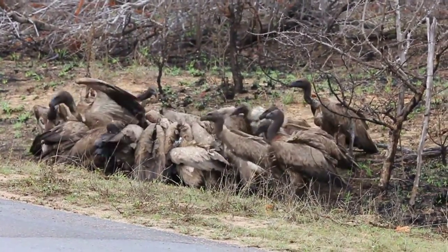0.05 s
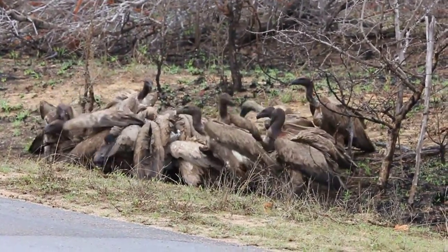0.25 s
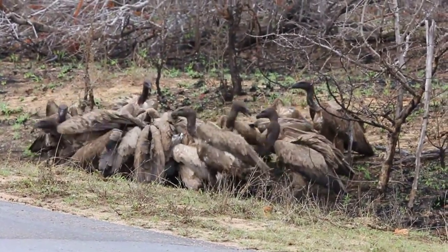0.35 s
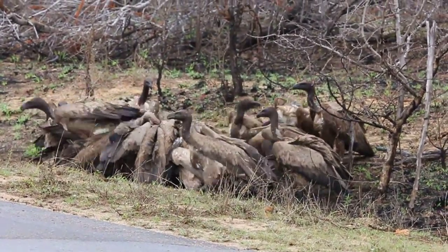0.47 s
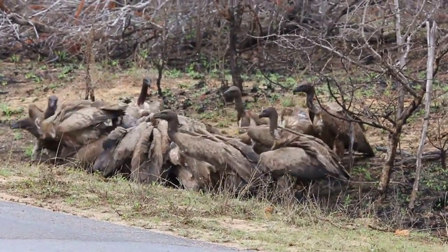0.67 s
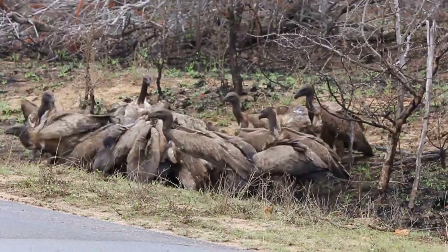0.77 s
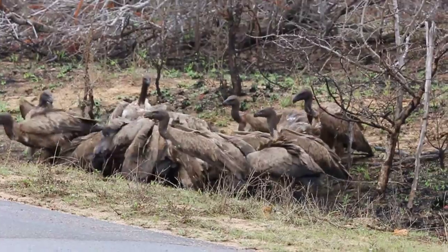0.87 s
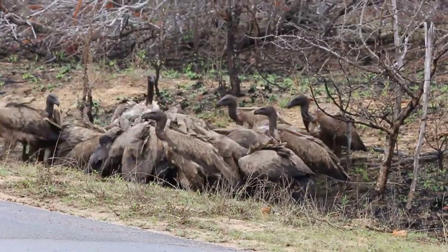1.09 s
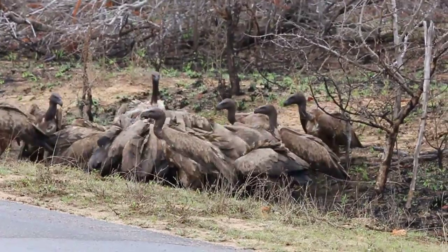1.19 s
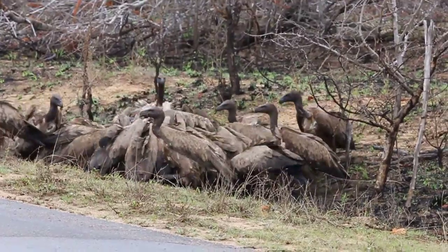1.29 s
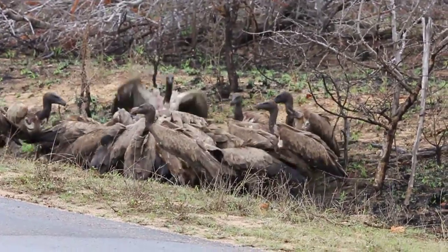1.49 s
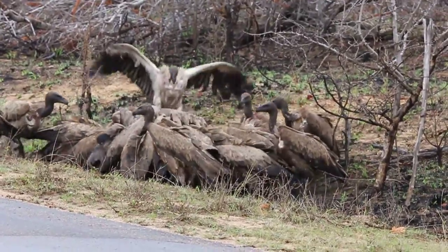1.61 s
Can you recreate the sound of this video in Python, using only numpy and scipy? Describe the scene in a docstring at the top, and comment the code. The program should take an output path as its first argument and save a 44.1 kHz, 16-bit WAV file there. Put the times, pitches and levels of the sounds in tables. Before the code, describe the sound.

Vultures squabble in the open over light wind and a low throb like an idling car. Thin whines and a faint hiss come first. A harsh rasp builds from 0.2 seconds, peaking with a loud squeal near 0.3. A shorter, softer rasp with two whines answers at 0.5. Feathers and dry grass rustle faintly, and a long, soft hiss runs from 1 second to the end, around 1.6.

```python
"""Vultures jostle at a roadside, over light wind and a low throb like an idling car.
First come thin whines from the windpipe and a fading hiss. A harsh rasp builds, made by
snapping tissue and air ringing the throat; one loud squeal cuts in and sinks under it.
Feathers and dry grass rustle now and then. A shorter rasp answers with two more whines,
and last a bird gives a long hiss, forcing air through its open beak."""
import sys
import numpy as np
from scipy import signal
from scipy.fft import rfft, irfft
from scipy.io import wavfile

SR = 44100
rng = np.random.default_rng(int(sys.argv[2]) if len(sys.argv) > 2 else 0)


def pcm_store(signal):
    """Save signal as 16-bit PCM."""
    levels = np.round(np.clip(np.atleast_2d(signal), -1, 1) * 32767)
    wavfile.write(sys.argv[1], SR, levels.astype(np.int16).T)


N = 72765
T, HZ = np.arange(N) / SR, np.fft.rfftfreq(N, 1 / SR)

# tone colour of the first and last hiss (frequency [Hz], relative level [dB])
BEAK_COLOUR = [(1500, -66), (2900, -10), (3400, -5), (3900, 1), (4600, -1), (5800, -0.5), (7000, -4.5),
               (9000, -10), (11000, -22), (12600, -23.5), (14000, -20.5), (16000, -29)]


def amp(db):
    """Turns decibels into a gain to multiply by."""
    return 10 ** (np.asarray(db) / 20)


def unit(x):
    """Scales a signal to an average (rms) size of 1."""
    return x / np.sqrt(np.mean(x ** 2) + 1e-20)


def shape(points):
    """Joins (frequency, level) points into a gain for every frequency."""
    hz, db = np.transpose(points)
    return amp(np.interp(np.log(HZ + 1), np.log(hz), db))


def filtered(x, gain):
    """Weights each frequency by its gain, then scales to size 1."""
    return unit(irfft(rfft(x) * gain, N))


def noise(gain):
    """Noise with the given tone colour."""
    return filtered(rng.standard_normal(N), gain)


def drift(hz):
    """A random wobble, up to about hz times a second."""
    return noise(np.exp(-(HZ / hz) ** 2))


def level(times, db):
    """A gain that follows a level curve and is silent outside it."""
    return amp(np.interp(T, times, db, left=-120, right=-120))


def voiced(source, colour, curve):
    """Colours a sound, then makes it follow a curve of level and brightness."""
    times, db, brightness = np.transpose(curve)
    brightness = np.interp(T, times, brightness)
    octaves = np.log2(np.clip(HZ, 1500, 11000) / 3000)
    out = np.zeros(N)
    for tilt in range(-16, 17, 4):  # blend copies from dull to bright
        share = np.maximum(1 - abs(brightness - tilt) / 4, 0)
        out += share * filtered(source, colour * amp(tilt * octaves))
    return out * level(times, db)


def wind():
    """Moving air makes a low noise that gently swells."""
    # tone colour of the wind (frequency [Hz], relative level [dB])
    colour = [(20, -6), (55, -3), (85, 0.5), (145, -1), (200, -9), (285, -3), (380, -7.5), (560, -8.5),
              (700, -14), (890, -10), (1000, -13.5), (1250, -17), (1480, -15.5), (2000, -20), (4000, -26.5),
              (8000, -36), (12000, -38), (15500, -42)]
    return amp(-39.5 + .5 * drift(hz=2)) * noise(shape(colour))


def engine():
    """Each firing gives a soft thump and a puff of clatter, over a faint hum."""
    # tone colour of the clatter (frequency [Hz], relative level [dB])
    clatter_colour = [(60, -8), (140, -6.5), (300, -2), (500, -15.5), (1000, -15.5), (2500, -42.5)]
    # tones of the hum (frequency [Hz], level [dB])
    hum_tones = [(91, -47.5), (104, -48.5), (129, -55), (145, -49.5), (365.5, -52.5), (467, -60),
                 (851, -54.5)]
    firing_hz, first_firing_s, thump_s, clatter_s = 22.75, 0.032224, 0.002744, 0.0165
    firings = (T - first_firing_s) * firing_hz + .5
    offset_s = (firings % 1 - .5) / firing_hz  # time from the nearest firing
    strength = (1 + .25 * rng.standard_normal(N))[np.floor(firings).astype(int) + 1]
    thump = -strength * amp(2.5 * T) * np.exp(-(offset_s / thump_s) ** 2)  # grows 2.5 dB a second
    thump = signal.sosfilt(signal.butter(1, 55.3, "high", fs=SR, output="sos"), thump)
    clatter = noise(shape(clatter_colour)) * np.exp(-abs(offset_s) / clatter_s)
    hum = sum(amp(db) * unit(np.sin(2 * np.pi * (hz * T + rng.random()) + 0.4 * drift(hz=1.33)))
              for hz, db in hum_tones)
    return amp(-42.5) * unit(thump) + amp(-49) * unit(clatter) + hum


def whistle(hz, overtone_db, jitter, flutter):
    """A windpipe tone with three overtones; jitter shakes its pitch, flutter its level."""
    phase = 2 * np.pi * np.cumsum(hz * (1 + jitter * drift(hz=444))) / SR
    bend_db = 5.5  # lifts the first overtone and lowers the third
    gains = [amp(overtone_db * k - bend_db * k * (k - 2)) for k in range(4)]
    tone = sum(gain * np.sin((k + 1) * phase) for k, gain in enumerate(gains))
    tone /= np.sqrt(sum(gain ** 2 for gain in gains))
    return unit(tone * (1 + flutter * drift(hz=220)))


def whines():
    """Short, sliding windpipe notes that swell and fade."""
    # (start [s], length [s], first pitch [Hz], last pitch [Hz], level [dB], jitter [share of pitch])
    notes = [(-.01, 0.0776, 1524, 1618, -47, 0.036), (-.01, 0.1178, 2010, 2155, -43, 0.0414),
             (0.064, 0.078, 2177, 2333, -42.5, .04), (0.075, 0.049, 1810, 1728, -41, 0.024),
             (0.143, 0.0365, 2590, 2469, -43, 0.0444), (0.157, 0.098, 1976, 1595, -39.5, 0.027),
             (0.188, 0.0641, 2371, 2127, -33.5, .055), (0.516, 0.0286, 1836, 1831, -34.5, 0.0327),
             (0.496, 0.073, 1587, 1467, -40, 0.0386)]
    out = np.zeros(N)
    for start, length, first_hz, last_hz, db, jitter in notes:
        progress = np.clip((T - start) / length, 0, 1)
        swell = np.sqrt(abs(np.sin(np.pi * progress)))
        hz = first_hz + (last_hz - first_hz) * progress
        out += amp(db) * swell * whistle(hz, overtone_db=-21, jitter=jitter, flutter=.55)
    return out


def hiss(curve, colour):
    """Air forced through an open beak, fluttering slightly."""
    air = rng.standard_normal(N) * amp(0.62 * drift(hz=90))
    return voiced(air, shape(colour), curve)


def fading_hiss():
    """A faint breath through the beak dies away."""
    # course of the breath (time [s], level [dB], brightness [dB per octave])
    curve = [(0, -55.5, 6.5), (.03, -47, -3.5), (.08, -55.5, 2), (.125, -56.5, -6), (.16, -51, -2),
             (.2, -55, 10)]
    return hiss(curve, BEAK_COLOUR)


def rasp(curve, throat):
    """Uneven snaps of tissue and rushing air make the throat ring."""
    # air that slips past without ringing (frequency [Hz], relative level [dB])
    air_colour = [(1000, -69.5), (1350, -33), (1550, -3.5), (4000, -7), (6000, -38), (8500, -18),
                  (11500, -28.5), (13800, -34.5), (16000, -36)]
    snaps_per_s, breath_gain, low_cut_hz = 520, 0.558, 1490
    snap_count = np.cumsum(snaps_per_s * np.exp(.4 * drift(hz=500.46))) / SR
    snaps = np.diff(np.floor(snap_count), prepend=0) * amp(2 * rng.standard_normal(N))
    source = unit(snaps - snaps.mean()) + breath_gain * rng.standard_normal(N)
    rattle = amp(1.2 * drift(hz=170))
    rings = sum(amp(db) / (1 + 1j * (HZ - hz) / width) ** 2 for hz, width, db in throat)
    low_cut = 1 / np.sqrt(1 + (low_cut_hz / (HZ + 1)) ** 30)
    return voiced(-source * rattle, (rings + shape(air_colour)) * low_cut, curve)


def long_rasp():
    """A harsh throat call that builds, holds and drops away."""
    # course of the call (time [s], level [dB], brightness [dB per octave])
    curve = [(.17, -52.5, -5), (.205, -38, 3.5), (.235, -35, 1.5), (.25, -34, -6.5), (.268, -29, -0.5),
             (.281, -24.5, 1), (.294, -20, 0.5), (.312, -21, -1.5), (.362, -23, 0.5), (.376, -26, 0),
             (.39, -25.5, 2.5), (.404, -41, 3), (.415, -45.5, -5.5), (.46, -48, -3.5)]
    # where the throat rings (frequency [Hz], half-width [Hz], relative level [dB])
    throat = [(1566, 66, -9), (1920, 195, -0.5), (2302, 334, 5.5), (2990, 217, 4.5), (3390.5, 220, 5),
              (3819.6, 328, 3), (4180, 177, 0.5), (5200, 413, -0.5), (5747, 404, -10), (7366, 276, -15)]
    return rasp(curve, throat)


def squeal():
    """A loud windpipe tone climbs, cracks and lingers low; air rushes out as it starts."""
    # the tone (time [s], pitch [Hz], level [dB], tilt [dB per overtone], jitter [share of pitch])
    tone_curve = [(.238, 2130, -38.5, -3, 0.0299), (.251, 2170, -21.5, -18, 0.0147),
                  (.259, 2270, -23.5, -16, 0.0257), (.265, 2450, -23.5, -18.5, 0.0153),
                  (.275, 2600, -17.5, -13, 0.0129), (.279, 2080, -18, -9.5, .04),
                  (.286, 1800, -23.5, 12.5, .045), (.291, 1500, -23.5, 0, 0.0404),
                  (0.305, 1467, -24, 1, 0.0154), (0.316, 1484, -31.5, -10, 0.017),
                  (.36, 1487, -31.5, -11, 0.0263), (0.384, 1490, -39, -27.5, 0.0333),
                  (.405, 1430, -46.5, -6, .03)]
    # the rush of air (time [s], level [dB], brightness [dB per octave])
    air_curve = [(.23, -47, -2), (.25, -34.5, -5), (.268, -28, -2.5), (.282, -28, -5.5), (.294, -26, -5),
                 (.303, -42, -5)]
    # tone colour of that air (frequency [Hz], relative level [dB])
    air_colour = [(1500, -36.5), (3000, -5), (4100, -4), (5500, 2.5), (7000, 1), (8500, -8.5), (10000, -18),
                  (12000, -28.5), (16000, -30.5)]
    times, hz, db, overtone_db, jitter = np.transpose(tone_curve)
    hz, overtone_db, jitter = (np.interp(T, times, column) for column in (hz, overtone_db, jitter))
    tone = level(times, db) * whistle(hz, overtone_db, jitter, flutter=.2)
    return tone + hiss(air_curve, air_colour)


def rustles():
    """Feathers and dry grass scratch briefly."""
    # (start [s], length [s], level [dB], middle frequency [Hz], half-width [octaves])
    scratches = [(.275, 0.061, -50, 13730, 0.146), (0.41, 0.0267, -52, 12950, 0.45),
                 (.65, 0.0071, -46, 3970, 0.68), (0.864, 0.0061, -49.5, 5000, 0.81),
                 (1.565, 0.011, -53, 10000, .9)]
    out = np.zeros(N)
    for start, length, db, hz, width in scratches:
        swell = np.sin(np.pi * np.clip((T - start) / length, 0, 1)) ** 2
        band = np.exp(-(np.log2((HZ + 1) / hz) / width) ** 2)
        out += amp(db) * swell * noise(band)
    return out


def short_rasp():
    """A shorter, softer throat call answers."""
    # course of the call (time [s], level [dB], brightness [dB per octave])
    curve = [(.48, -48.5, -2), (.503, -36, -7), (.526, -29.5, -5), (.546, -33, -4), (.566, -48.5, -2),
             (.6, -45.5, -7.5), (.63, -67.5, -6)]
    # where the throat rings (frequency [Hz], half-width [Hz], relative level [dB])
    throat = [(1496, 132, -10.5), (1813.6, 130, 3), (2185, 282, -5.5), (3017, 174, -7), (3410, 150, -14),
              (3844, 190, -18.5), (4410, 272, -6), (5300, 287, -6), (5770, 330, -6.5), (6880, 334, -13.5)]
    return rasp(curve, throat)


def long_hiss():
    """A drawn-out breath through the beak lasts to the end."""
    # course of the breath (time [s], level [dB], brightness [dB per octave])
    curve = [(.93, -65, 0), (.995, -47.5, -4), (1.09, -46.5, -2), (1.17, -46.5, 2.5), (1.235, -42, 1),
             (1.33, -43.5, -0.5), (1.43, -44, 4), (1.54, -46.5, 3.5), (1.62, -40.5, -5.5), (1.65, -42, -7)]
    return hiss(curve, BEAK_COLOUR)


def echo(x):
    """Adds the faint sound that bounces off ground and branches."""
    echo_db, fade_s = -21, .22
    t = T[:SR // 2]
    tail = rng.standard_normal(len(t)) * amp(-60 * t / fade_s) * (t > .004)
    return x + amp(echo_db) * signal.fftconvolve(x, tail / np.linalg.norm(tail))[:N]


def scene():
    """The birds in the open, over wind and engine, in one channel."""
    birds = whines() + fading_hiss() + long_rasp() + squeal() + rustles() + short_rasp() + long_hiss()
    return (wind() + engine() + echo(birds))[None]


def record(dry):
    """Cuts the very highest treble, above 15720 Hz."""
    low_pass = signal.firwin(801, 15720, window=("kaiser", 9), fs=SR)
    return signal.oaconvolve(dry, low_pass[None], "same")


dry = scene()
out = record(dry)
pcm_store(out)
```